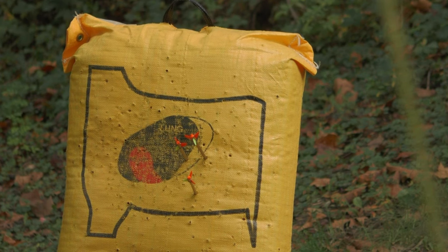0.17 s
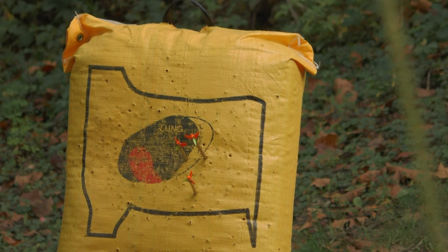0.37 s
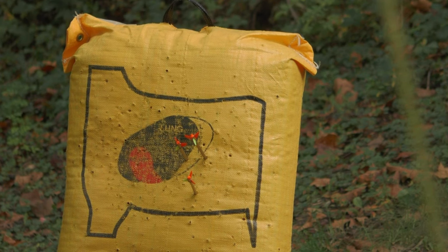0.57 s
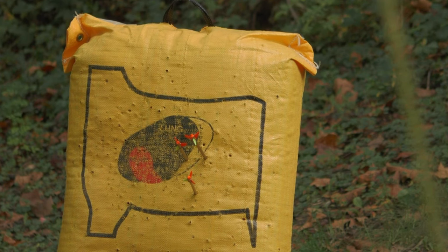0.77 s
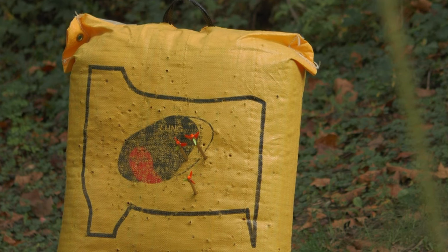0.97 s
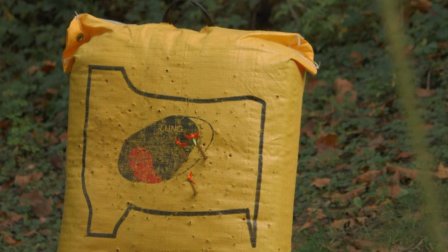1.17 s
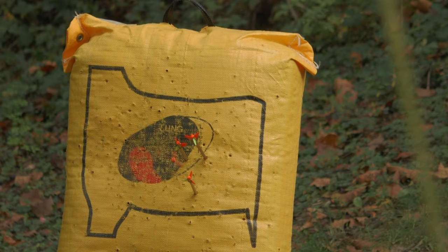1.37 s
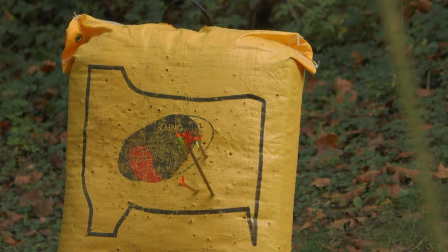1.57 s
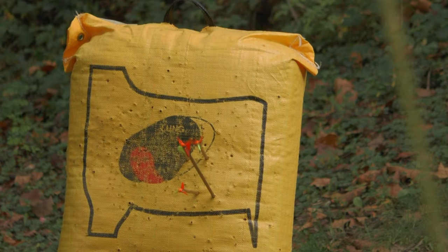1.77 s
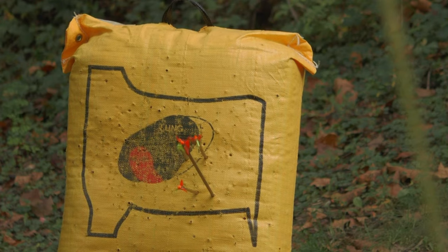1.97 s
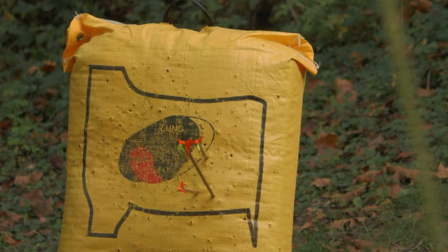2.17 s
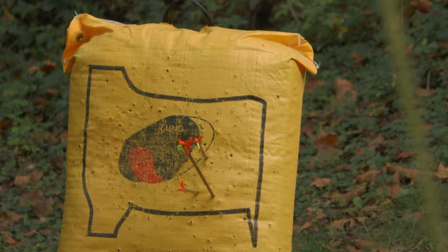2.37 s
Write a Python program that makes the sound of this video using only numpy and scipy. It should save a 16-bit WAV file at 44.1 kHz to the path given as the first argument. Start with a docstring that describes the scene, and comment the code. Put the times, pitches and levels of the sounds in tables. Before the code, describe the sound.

An arrow slaps hard into a stuffed bag just after a distant bow clatters, crickets chirring outdoors

```python
"""A short grainy rustle is cut off with a faint click, while thin tones step down in pitch, over leaves and
wind. A bush cricket chirrs in looped wing strokes of narrow noise over a far chorus; a bird peeps and twitters.
A bow is loosed: bursts of clatter, string hiss and ringing limbs, returned by the trees as fading noise. Its
arrow slaps a stuffed bag beside the microphone, ringing the bag's modes; the trees return this blow too. Gain
control ducks the sound after each loud blow and lets it recover."""
import sys
import numpy as np
from scipy import signal
from scipy.io import wavfile
from scipy.ndimage import uniform_filter1d

SR = 44100
rng = np.random.default_rng(int(sys.argv[2]) if len(sys.argv) > 2 else 0)


def volts(x):
    """Linear amplitude factor 10**(x/20) for a level x in dB, scalar or array-like."""
    e = np.asarray(x, float) / 20
    return 10 ** e


def int16_out(signal):
    """Quantize to a 16-bit WAV file."""
    q = np.round(np.clip(np.atleast_2d(signal).T, -1, 1) * 32767)
    wavfile.write(sys.argv[1], SR, q.astype(np.int16))


N = 106016  # length [samples]

# colour of the bag's blow, in its filling and its echo: (frequency [Hz], relative level [dB])
BAG_COLOUR = [(290, -36), (500, 1.5), (545, -32), (688, -12), (880, -12.5), (1090, -11), (2460, -5),
              (3440, -17), (3860, -6), (5240, -20), (10400, -17), (16000, -41)]


def evened(x):
    """Scales to rms 1."""
    return x / np.sqrt(np.mean(x ** 2) + 1e-20)


def read_spectrum(points, hz):
    """Reads a table of (frequency [Hz], value) rows on a log-frequency axis."""
    f, value = np.transpose(points)
    return np.interp(np.log(hz + 1), np.log(f + 1), value)


def envelope(curve):
    """Gain over time from (time [s], level [dB]) rows."""
    return volts(np.interp(np.arange(N) / SR, *np.transpose(curve)))


def add(mix, s, sound):
    """Mixes a sound in at time s."""
    part = mix[round(s * SR):][:len(sound)]
    part += sound[:len(part)]


def whistle(hz, width, size):
    """Noise through two equal resonant poles, each width Hz wide, shifted up to hz; rms 1."""
    settle = 4000  # samples dropped while the resonance builds up
    pole = np.exp(-np.pi * abs(width) / SR)
    z = rng.standard_normal((size + settle, 2)) @ [1, 1j]
    z = signal.lfilter([1], np.convolve([1, -pole], [1, -pole]), z)[settle:]
    carrier = np.exp(2j * np.pi * hz * np.arange(size) / SR)
    return evened((z * carrier).real)


def ring(db, hz, t60):
    """One struck mode: a sine that loses 60 dB in t60 seconds, at most half a second long."""
    t = np.arange(SR // 2) / SR
    return volts(db - 60 * t / t60) * np.sin(2 * np.pi * hz * t)


def glides(rows):
    """Thin tones whose pitch glides under a half-sine swell."""
    out = np.zeros(N)
    for s, length, first_hz, last_hz, db in rows:
        u = np.arange(0, 1, 1 / (length * SR))
        hz = first_hz + (last_hz - first_hz) * u ** 1.3
        add(out, s, volts(db) * np.sin(np.pi * u) * np.sin(2 * np.pi * np.cumsum(hz) / SR))
    return out


def noise(spectrum, patchy_db, size=1024, fade_from_s=9, wide_db=0):
    """Stereo noise of a given colour with drifting patches; after fade_from_s it dies as the woods do."""
    # stereo width before wide_db is added: (frequency [Hz], side minus mid [dB])
    stereo_width = [(60, -28), (110, -48), (200, -73.5), (380, -24), (700, -20), (1290, -28), (2380, -21.5),
                    (4400, -22), (8120, -59), (15000, -54)]
    # decay of sound among the trees: (frequency [Hz], t60 [s])
    woods_decay = [(500, 2.5), (1300, 2.1), (2500, 1.05), (4000, 1.32), (9000, 0.64), (15000, 1.5)]
    hop = size // 4
    frames, hz = N // hop + 5, np.fft.rfftfreq(size, 1 / SR)
    a, b, c, d, patches = rng.standard_normal((frames, len(hz), 5)).T
    patches = uniform_filter1d(patches, size=9, axis=0)  # over frequency
    patches = evened(uniform_filter1d(patches, size=7, axis=1))  # over time
    mid = a + 1j * b
    side = (c + 1j * d) * volts(read_spectrum(stereo_width, hz) + wide_db)[:, None]
    colour = volts(read_spectrum(spectrum, hz))[:, None]
    fading_s = np.maximum(np.arange(frames) * hop / SR - fade_from_s, 0)
    fade = volts(-60 * fading_s / read_spectrum(woods_decay, hz)[:, None])
    z = np.array([mid + side, mid - side]) * colour * volts(patchy_db * patches) * fade
    x = signal.istft(z, nperseg=size, noverlap=size - hop)[1][:, :N]
    return x / np.sqrt(size * np.mean(colour ** 2) / 3)  # takes out the table's overall level


def rustle():
    """Coloured noise made grainy by short random bursts and cut off abruptly; thin tones stepping down in pitch
    are added alongside."""
    # colour: (frequency [Hz], relative level [dB])
    rustle_colour = [(710, -47), (1200, -29), (1340, -29.5), (3220, -24.5), (4600, -19), (5070, -31),
                     (6650, -13), (7910, -18.5), (10100, -4.5), (16000, -24.5)]
    # (time [s], level [dB])
    rustle_curve = [(0.0, -44.5), (0.032, -38.5), (0.054, -41.5), (0.096, -39), (0.126, -40.5),
                    (0.134, -55), (0.168, -44.5)]
    # thin tones: (start [s], length [s], first pitch [Hz], last pitch [Hz], peak level [dB])
    stepped_tones = [(.005, 0.04, 2070, 2050, -57.5), (.005, 0.024, 4150, 4050, -52.5),
                     (.035, 0.042, 1730, 1690, -58), (.07, 0.04, 1386, 1345, -59.5)]
    end_s = .170
    grains = volts(2.0 * np.minimum(rng.exponential(size=N), 4))
    grains = uniform_filter1d(grains.repeat(40)[:N], size=30)  # 40-sample grains, softened edges
    x = noise(rustle_colour, patchy_db=3.0, size=512) * evened(grains) * envelope(rustle_curve)
    return x * (np.arange(N) < end_s * SR) + glides(stepped_tones)


def leaves():
    """Leaves and far air: steady coloured noise."""
    # colour: (frequency [Hz], relative level [dB])
    air_colour = [(290, -45), (500, -14), (690, -12.5), (1150, -8), (2000, -11.5), (3100, -15),
                  (4300, -8.5), (5400, -2.5), (7300, -7), (8700, -12), (10500, -7.5), (13500, -9.5),
                  (16000, -11)]
    return volts(-54.5) * noise(air_colour, patchy_db=-0.2)


def wind():
    """Low noise swelling in gusts on the microphone, over a steady deep rumble."""
    # colours of gusts and rumble: (frequency [Hz], relative level [dB])
    gust_colour = [(100, -18.5), (160, -13), (213, 0.5), (265, -9), (320, -6), (375, -22.5), (420, -21),
                   (500, -48.5), (680, -83)]
    rumble_colour = [(18, -59), (30, -29), (54, -32), (75, -5), (108, -5), (170, -0.5), (220, -46),
                     (370, -120)]
    # gusts: (time [s], level [dB])
    gust_curve = [(0, -48.5), (.08, -54), (.15, -56), (.19, -46.5), (.28, -50), (.33, -42), (.45, -47.5),
                  (.6, -47.5), (.75, -50), (.87, -51.5), (1, -57), (1.12, -53), (1.4, -56.5), (1.7, -45),
                  (1.85, -49.5), (1.93, -50.5), (2.02, -52), (2.1, -47), (2.2, -55.5), (2.4, -50)]
    gusts = noise(gust_colour, patchy_db=0.47) * envelope(gust_curve)
    return gusts + volts(-56.5) * noise(rumble_colour, patchy_db=1.5, size=2048)


def insects():
    """Bush cricket: narrow noises pulsed at fixed places in every wing stroke; the far chorus is steady."""
    # sounds in a stroke: (place [turns], length [turns], centre [Hz], pole width [Hz], level [dB])
    wing_sounds = [(-0.13, .17, 6350, 20, -52.5), (-0.11, .2, 6350, 35, -51),
                   (-0.044, 0.091, 5980, 200, -57.5), (0.025, 0.083, 12150, 810, -54),
                   (-0.43, .05, 12400, 350, -60), (0.14, .07, 11750, 450, -62)]
    # chorus: (centre [Hz], pole width [Hz], rms level [dB])
    chorus = [(6010, 550, -61), (6170, 220, -56.5), (6494, 340, -58.5), (12100, 1400, -65)]
    strokes_per_s, stroke_s = 21.05, .6185  # rate; time of one reference stroke
    turns = (np.arange(N) / SR - stroke_s) * strokes_per_s
    out = np.zeros(N)
    for place, length, hz, width, db in wing_sounds:
        from_place = (turns - place + .5) % 1 - .5
        out += volts(db) * np.exp(-(from_place / length) ** 2) * whistle(hz, width, N)
    for hz, width, db in chorus:
        out += volts(db) * whistle(hz, width, N)
    return out


def click_and_shoves():
    """A faint click at the cut, then one-sided shoves of air from the limbs and from the bag."""
    # first row the click, the others shoves of air: (start [s], length [s], peak level [dB])
    bumps = [(.1693, 0.0015, -47), (1.1758, 0.0052, -12), (1.1818, 0.0037, -20.5), (1.5507, 0.0058, -6.5),
             (1.5549, .0058, -11), (1.5605, 0.0038, -30)]
    cut_click, *air_shoves = bumps
    out = np.zeros(N)
    for s, length, db in [cut_click] + air_shoves:
        add(out, s, volts(db) * np.hanning(round(length * SR)))
    return out


def wind_knocks():
    """Wind knocks on the microphone, each a low decaying ring."""
    # (time [s], starting level [dB], pitch [Hz], t60 [s])
    thumps = [(.305, -36, 210.6, 0.33), (1.906, -35.5, 205, 0.28)]
    out = np.zeros(N)
    for s, *mode in thumps:
        add(out, s, ring(*mode))
    return out


def bird():
    """Two falling peeps, and a blurred twitter further off made of narrow noise."""
    # (start [s], length [s], first pitch [Hz], last pitch [Hz], peak level [dB])
    peeps = [(.85, .045, 4850, 3900, -61), (2.019, .027, 4650, 3900, -55)]
    # (start [s], end [s], centre [Hz], pole width [Hz], level [dB])
    twitter = (.88, 1.11, 4280, 330, -65)
    start, end, hz, width, db = twitter
    spell = envelope([(start - .03, -40), (start + 0.014, 0), (end - .03, 0), (end + .02, -40)])
    return glides(peeps) + volts(db) * spell * whistle(hz, width, N)


def bow():
    """Noise bursts of clatter, the hiss of the string tearing through air and the low ring of the limbs."""
    # string, cams and rest: (peak [s], level [dB], centre [Hz], pole width [Hz], rise [s], t60 [s])
    clatter = [(1.1741, -10.5, 10860, 2485, 0.0015, 0.0062), (1.174, -18.5, 2817, 2160, 0.0017, 0.023),
               (1.179, -16.5, 8000, 2585, 0.0019, 0.0087), (1.1873, -19.5, 3010, 700, 0.0031, 0.016),
               (1.1862, -21, 10560, 2510, 0.0015, .02), (1.1897, -10, 9535, 6960, 0.00047, 0.0097),
               (1.192, -14, 10700, 6000, .001, 0.018), (1.189, -22, 2806, 2470, 0.0014, 0.027),
               (1.2007, -13, 10560, 1800, 0.0004, 0.013), (1.201, -20, 3007, 2500, 0.0016, 0.028),
               (1.2045, -29, 10500, 2000, 0.00066, .03), (1.206, -32.5, 2083, 600, 0.0019, 0.026),
               (1.223, -30, 8800, 6000, 0.00067, 0.018), (1.2283, -32, 13000, 3000, .0006, 0.011),
               (1.2364, -32, 11250, 6000, .0006, .01), (1.256, -34, 7800, 1190, 0.00058, 0.0082),
               (1.319, -37, 10800, 2520, .0008, .012), (1.322, -43, 10900, 3010, .0008, .015),
               (1.336, -37.5, 10000, 3000, .0008, .012), (1.3524, -28, 9800, 2210, 0.00029, 0.008),
               (1.3527, -36, 13300, 2000, .0005, .01)]
    # (time [s], starting level [dB], pitch [Hz], t60 [s])
    limbs = [(1.1907, -15.5, 195, 0.056), (1.193, -26.5, 133.2, 0.26)]
    # string hiss, colour: (frequency [Hz], relative level [dB])
    hiss_colour = [(290, -64.5), (500, -33.5), (1370, -12), (1570, -38), (1810, 5.5), (3110, -9),
                   (5840, -16), (10200, -10), (15600, -17.5), (16500, -25)]
    # string hiss: (time [s], level [dB])
    hiss_curve = [(1.160, -51.5), (1.169, -39), (1.171, -24.5), (1.194, -33), (1.208, -45), (1.216, -49),
                  (1.23, -73)]
    out, t = np.zeros(N), np.arange(-400, 2600) / SR  # t is 0 at the peak of a burst
    for s, db, hz, width, rise, t60 in clatter:
        shape = np.where(t < 0, np.exp(-(t / rise) ** 2), volts(-60 * t / t60))
        add(out, s + t[0], volts(db) * shape * whistle(hz, width, len(t)))
    for s, *mode in limbs:
        add(out, s, ring(*mode))
    hiss_gain = envelope([(1.14, -120)] + hiss_curve + [(1.3, -120)])
    return out + noise(hiss_colour, patchy_db=3, size=128) * hiss_gain


def echoes():
    """Diffuse noise returned by the trees after both blows, following a curve and then dying band by band."""
    # colour: (frequency [Hz], relative level [dB])
    bow_colour = [(290, -53), (500, -13.5), (819, -26), (1160, -3.5), (1380, -19), (2100, -10), (3390, -11),
                  (3750, -2), (6420, -45), (7310, -13.5), (9920, -8.5), (16000, -30)]
    # both returns: (time [s], level [dB])
    bow_curve = [(1.19, -51), (1.21, -36.5), (1.25, -43), (1.31, -41), (1.361, -48)]
    bag_curve = [(1.55, -49), (1.56, -36), (1.6, -35.5), (1.65, -37), (1.7, -43)]
    out = np.zeros((2, N))
    for colour, curve in ((bow_colour, bow_curve), (BAG_COLOUR, bag_curve)):
        gain = envelope([(curve[0][0] - .005, -140)] + curve)
        out += noise(colour, patchy_db=.7, size=512, fade_from_s=curve[-1][0], wide_db=3) * gain
    return out


def arrow():
    """Each slap is a short crack that rings the modes of the bag; the filling crunches briefly."""
    # tip, shaft and rebound on the bag: (time [s] each)
    slap_times = 1.5472, 1.5502, 1.5535
    # the same slaps: (body level [dB], snap level before the contact window [dB])
    slap_levels = [(-17, -30), (-4.5, -12), (-9, -16)]
    # tones during contact: (pitch [Hz], relative level [dB])
    crack_tones = [(1300, -6.5), (2250, 1.5), (4300, -12)]
    # noisy snap of the fabric: (centre [Hz], pole width [Hz], relative level [dB])
    snap_bands = [(5090, 4900, -13), (8000, 1840, -2.5), (10020, 2200, -3.5), (12380, 7300, -2)]
    # modes of the bag: (pitch [Hz], relative level [dB], t60 [s])
    bag_modes = [(1123, -21.5, 0.044), (3795, -16, .05), (2390, -30, 0.062), (5240, -28, 0.048),
                 (8300, -29, 0.054), (9860, -20, 0.044)]
    # crunch of the filling: (start [s], starting level [dB], t60 [s])
    stuffing = (1.5545, -21.5, 0.042)
    contact_s = .0016
    out, t = np.zeros(N), np.arange(0, contact_s, 1 / SR)
    contact = np.sin(np.pi * t / contact_s) ** 2
    body = sum(volts(db) * np.sin(2 * np.pi * hz * t) for hz, db in crack_tones)
    for s, (body_db, snap_db) in zip(slap_times, slap_levels):
        snap = sum(volts(db) * whistle(hz, width, size=400)[:len(t)] for hz, width, db in snap_bands)
        add(out, s, (volts(body_db) * body + volts(snap_db) * evened(snap)) * contact)
        modes = sum(ring(db, hz, t60) for hz, db, t60 in bag_modes)
        add(out, s + contact_s / 2, volts(body_db) * modes)
    s, db, t60 = stuffing
    t = np.arange(N) / SR - s
    crunch_gain = (t > 0) * volts(db - 60 * abs(t) / t60)
    return out + noise(BAG_COLOUR, patchy_db=2.0, size=128) * crunch_gain


def near_reflection(blows):
    """A late, band-limited copy of the blows, of opposite sign at the two microphone ports."""
    delay_s, low_hz, high_hz = 0.00044, 700, 6000
    band = signal.butter(1, [low_hz, high_hz], "band", fs=SR, output="sos")
    side = signal.sosfilt(band, np.roll(blows.mean(0), round(delay_s * SR)))
    return volts(-25) * np.outer([1, -1], side)


def scene():
    """All sources; the blows reach the two ports a little differently."""
    surroundings = rustle() + leaves() + wind() + insects() + wind_knocks() + bird()
    blows = click_and_shoves() + bow() + arrow()
    return surroundings + blows + near_reflection(blows) + echoes()


def housing(x):
    """The microphone housing cuts narrow notches by subtracting resonances."""
    # (centre [Hz], width [Hz])
    notches = [(540, 96), (855, 170), (3450, 203)]
    for hz, width in notches:
        x = x - signal.lfilter(*signal.iirpeak(hz, hz / width, fs=SR), x)
    return x


def gain_control(x):
    """Ducks by a share of the held level's excess over a threshold, a little late, and recovers."""
    threshold_db, duck_share = -21, 0.25
    hold_fall_db_per_s = 33.5  # how fast the held level sinks after a peak
    power_db = 10 * np.log10(abs(uniform_filter1d((x ** 2).mean(0), size=200)) + 1e-12)
    fall = np.arange(N) * hold_fall_db_per_s / SR
    held_db = np.maximum.accumulate(power_db + fall) - fall
    over_db = np.maximum(held_db - threshold_db, 0)
    late_db = np.roll(uniform_filter1d(over_db, size=600), 900)  # smoothing and delay in samples
    return x / volts(duck_share * late_db)


def roll_off(x):
    """The treble ends steeply here."""
    return signal.sosfilt(signal.butter(12, 16840, fs=SR, output="sos"), x)


def record(dry):
    """Housing notches, gain control, low cut, soft overload of the input and a treble limit."""
    coupling_hz, ceiling, edge_hz = .6, .95, 15940
    x = gain_control(housing(dry))
    pole = np.exp(-2 * np.pi * coupling_hz / SR)
    x = signal.lfilter([1, -1], [1, -pole], x)
    x = x / (1 + (x / ceiling) ** 4) ** .25
    x = signal.oaconvolve(x, signal.firwin(127, edge_hz, fs=SR)[None], "same")
    return roll_off(x)


dry = scene()
out = record(dry)
int16_out(out)
```